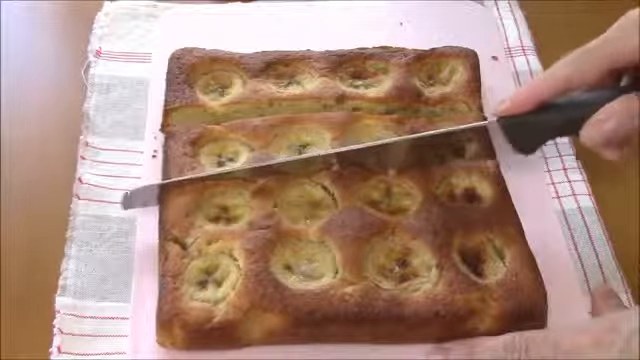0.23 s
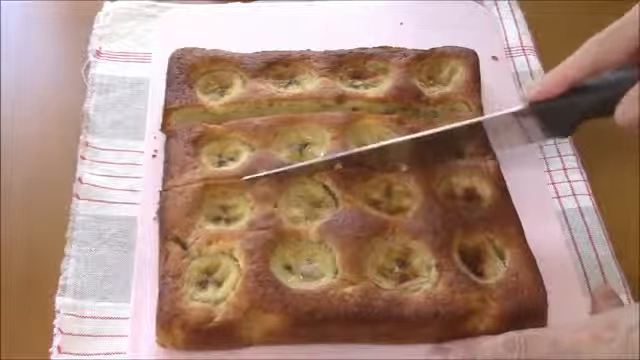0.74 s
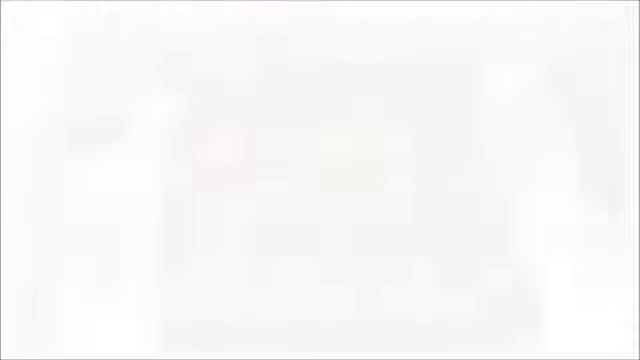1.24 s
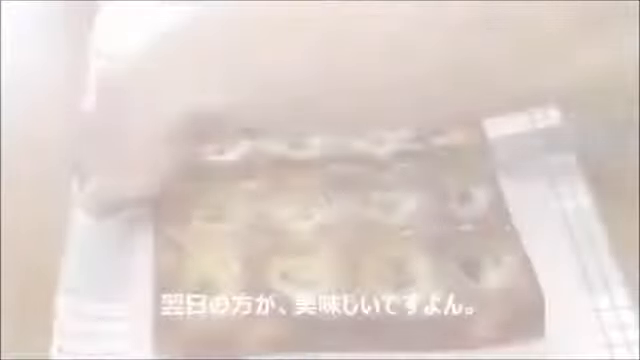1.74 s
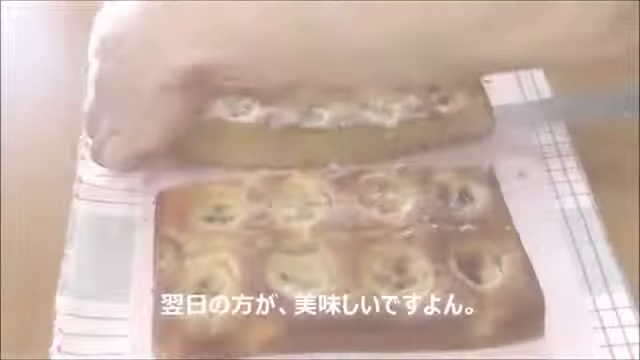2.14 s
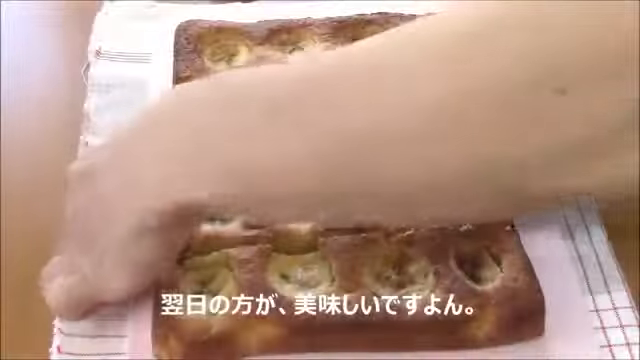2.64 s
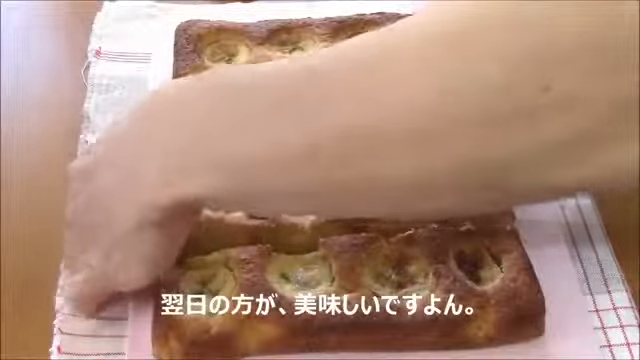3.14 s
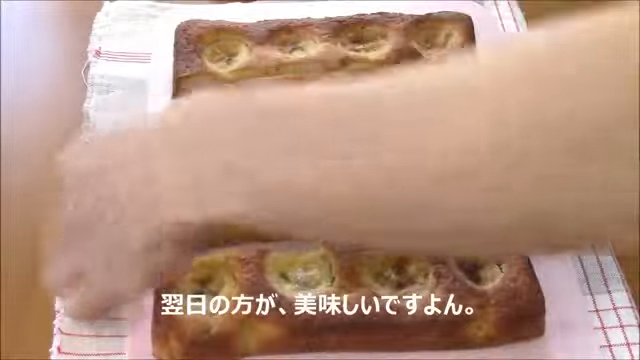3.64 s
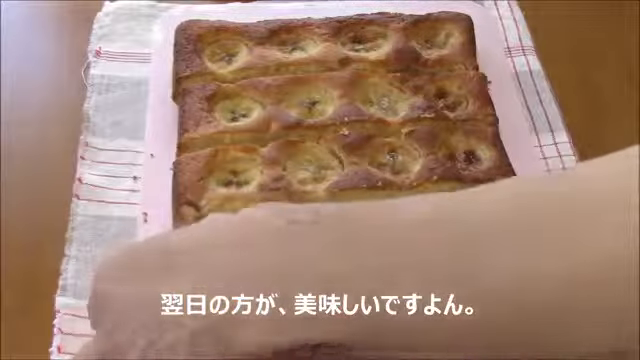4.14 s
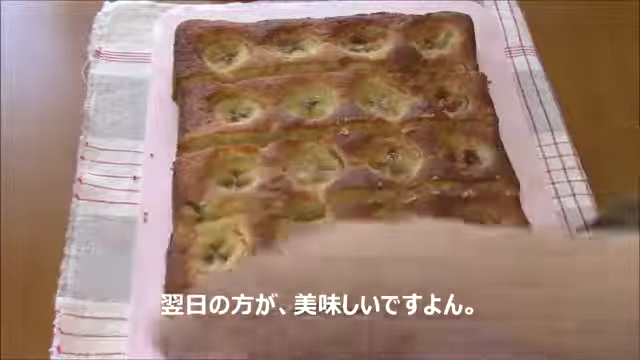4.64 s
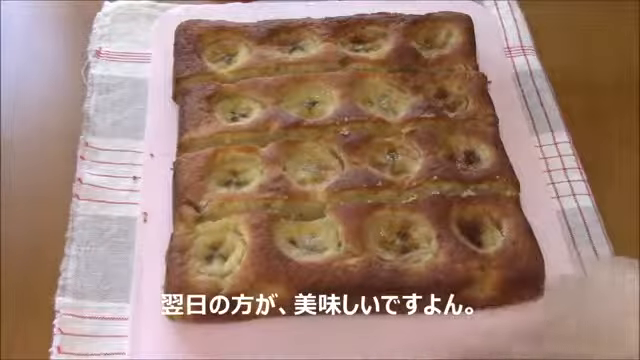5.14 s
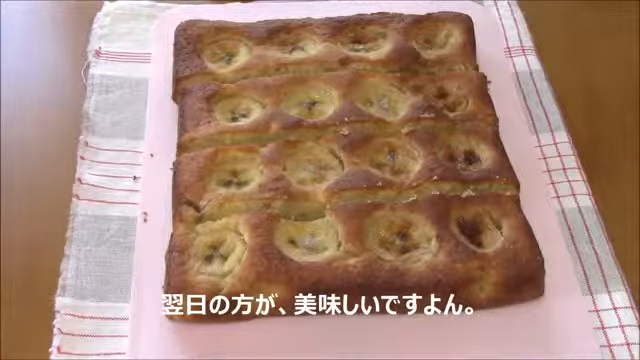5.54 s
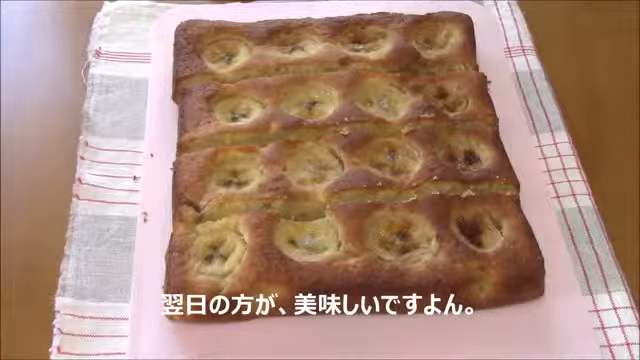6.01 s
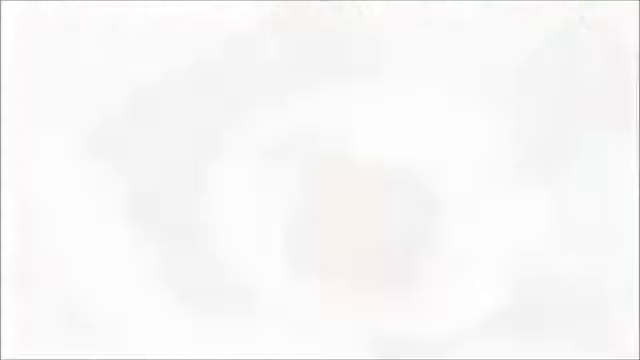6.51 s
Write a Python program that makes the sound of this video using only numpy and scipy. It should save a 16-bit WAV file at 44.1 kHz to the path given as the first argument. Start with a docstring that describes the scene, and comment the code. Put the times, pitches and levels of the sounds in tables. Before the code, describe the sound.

For the first second or so, a kitchen knife saws faintly through cake in quick strokes, with small snaps of crust. At 1.3 seconds it knocks on a plastic cutting board and drags softly. Around 2.3 seconds come louder knocks, a rasping scrape and a brief squeal, then more dragging and a tap. Another short scrape comes at 3.6 seconds. From 3.9 to 4.6 there is a run of light knocks and drags, a faint moist peeling of crumb and one more scrape. A hand brushes softly over the board around 5.4, with tiny crust ticks. At 6.5 seconds steel cutlery slides, squeaks and clinks several times on a plate, the brightest, loudest moment. Everything is close, in a small kitchen with soft room air, a few very faint high whining spurts and a faint appliance hum that stops as the cutlery begins.

```python
"""A kitchen knife saws through a cake, down to a plastic cutting board. Blade and slices drag,
scrape and squeal: stick-slip pulses ring the board. Crust crackles, moist crumb peels off,
light taps knock, a hand brushes past. At the end steel cutlery slides, squeaks and clinks
on a plate. Behind: small-kitchen reverb, room air, a faint high whine in paired spurts and
an appliance hum that stops as the cutlery starts."""
import sys
import numpy as np
from scipy import signal
from scipy.fft import rfft, irfft, next_fast_len
from scipy.io import wavfile
from scipy.ndimage import uniform_filter1d, map_coordinates

SR = 44100
rng = np.random.default_rng(int(sys.argv[2]) if len(sys.argv) > 2 else 0)


def generate_wav(signal):
    """Clip the signal to [-1, 1] and save it as 16-bit WAV at the path in sys.argv[1]."""
    frames = np.transpose(np.atleast_2d(signal))
    scaled = np.clip(frames, -1, 1) * 32767
    pcm = np.round(scaled).astype(np.int16)
    wavfile.write(sys.argv[1], SR, pcm)


N = 298557
TIME_S = np.arange(N) / SR

# Strokes on the board: (start [s], rise [s], hold [s], fall [s], relative level [dB],
# treble trim [dB], resonance [Hz], resonance lift [dB])
HARD_SCRAPES = [ (2.274, 0.088, 0.041, 0.077, -30.5, -17.5, 1200, 1.5),
                (3.564, .094, .028, 0.051, -29.5, -23.5, 1603, 3),
                (4.518, .075, .034, .04, -28.5, -19.5, 1302, 4), ]
SOFT_DRAGS = [ (.835, 0.027, .005, 0.013, -50.5, -12, 1290, 7),
              (.975, 0.028, 0.0099, 0.014, -48.5, -13, 1280, 5),
              (1.34, 0.0079, 0.024, 0.34, -46, -14, 420, 10),
              (1.49, .05, 0.016, 0.059, -49.5, -17, 430, 6.5),
              (1.63, 0.073, 0.014, 0.15, -43.5, -11.5, 470, 11),
              (1.85, .03, 0.0077, 0.084, -53, -20, 1300, 8), (2.45, 0.027, 0.03, 0.33, -43.5, -14, 760, 3),
              (2.5, .06, 0.019, 0.12, -42.5, -15.5, 740, 3),
              (2.668, 0.099, 0.063, 0.077, -42.5, -13.5, 1310, 3.5),
              (3.915, 0.017, 0.084, .1, -55.5, -11, 1290, -4),
              (3.99, 0.08, 0.12, 0.066, -42.5, -18, 1250, 3.5),
              (4.163, 0.011, 0.011, .055, -37, -21, 1290, 11.5),
              (5.01, 0.021, 0.035, .08, -62.5, -12, 1400, 10),
              (5.11, 0.1, 0.012, 0.021, -58, -1.5, 1400, 11), ]
# Slice squeals: (centre [s], top pitch [Hz], level [dB], overtone gain [dB])
SLICE_SQUEALS = [(2.378, 758, -31.8, 0), (2.555, 725, -43, -22)]
# Squeal overtones: (harmonic number, relative level [dB])
SQUEAL_OVERTONES = [(2, 7), (3, 5), (4, -5)]
# Saw effort on the crust: (time [s], level [dB])
SAW_LEVELS = [(0, -66.5), (.25, -65.5), (.55, -61.5), (.82, -61.5), (1.25, -68.5)]
# Crust snaps: (time [s], relative level [dB])
CRUST_SNAPS = [(0.079, -55), (.523, -50), (.679, -43), (0.823, -44), (3.264, -55.5), (3.287, -54),
               (3.346, -54), (5.441, -50), (5.468, -47), (5.6, -45.5)]
# Board taps: (time [s], relative level [dB], treble trim [dB])
BOARD_TAPS = [(0.989, -52, 13), (1.343, -28.5, 13), (1.620, -42.5, -4), (1.988, -39, -7), (2.275, -32, -8),
              (2.304, -25, -17), (2.713, -30, 3.5), (3.588, -37, 0), (3.922, -31.5, 9), (4.169, -26.5, -5),
              (4.300, -30.5, -3.5), (4.397, -32, -15), (4.457, -35, -25), (4.623, -29.5, 10),
              (4.928, -43.5, 7)]
# Noise strokes: (start [s], rise [s], hold [s], fall [s], level [dB])
CRUMB_PEELS = [(4.0, 0.066, 0.038, 0.11, -58)]
HAND_BRUSHES = [(5.28, 0.027, .005, 0.069, -71), (5.375, 0.097, 0.0051, 0.023, -53.5),
                (5.59, .01, .005, .07, -58.5)]
STEEL_SLIDES = [(6.53, 0.0019, 0.077, 0.031, -44.5), (6.625, .02, .015, 0.14, -50)]
# Steel squeaks: (start [s], rise [s], hold [s], fall [s], level [dB], initial pitch [Hz])
STEEL_SQUEAKS = [(6.562, 0.015, 0.011, 0.04, -45, 5050), (6.623, .008, .006, 0.036, -49, 4550)]
# Strikes on the plate: (time [s], level [dB], long ring [dB], pitch ratio)
PLATE_CLINKS = [(6.5304, -39, -18, 1.2), (6.6283, -25, -20, 1.075), (6.6569, -28.5, -13, 1.2),
                (6.6750, -18, -5, 1.0), (6.7202, -38.5, 5, .99), (6.754, -44, -7, 1.07)]
# Board resonances: (frequency [Hz], width [Hz], lift [dB])
BOARD_MODES = [(420, 200, 5), (612, 160, -7), (732, 120, 6.5), (1239, 37, 6.5), (1527, 8.7, 12.5),
               (1647, 62, 10.5), (2000, 250, -6.5), (2180, 96, 4), (2364, 150, 7), (2885, 106, 4.5),
               (3180, 94, -13), (3350, 57, 4.5), (4130, 240, 4), (4550, 220, -3.5), (5170, 280, 5.5),
               (5640, 260, -5.5), (7250, 690, 1.5), (9880, 150, 7)]
# Cutlery and plate modes at pitch ratio 1: (frequency [Hz], level [dB], T60 [s])
STEEL_MODES = [(1430, -5.5, 0.019), (3860, -7, 0.45), (4170, -6.5, 0.074), (6230, 6, 0.099),
               (6450, -11, .06), (7130, -18, .1), (9150, -2.5, 0.09), (10230, -10, 0.067),
               (11670, 5.5, 0.051), (12200, 3.5, 0.046), (12240, 4.5, 0.055), (13500, -14, .05),
               (14450, -10, .12)]
# Source spectra: (frequency [Hz], relative level [dB])
SCRAPE_SPECTRUM = [(100, -42), (250, -41), (400, -21), (750, -3.5), (1300, 5), (2200, -1), (3300, -7.5),
                   (5500, -21), (9000, -30), (13000, -32.5), (15500, -44)]
DRAG_SPECTRUM = [(100, -50), (220, -6.5), (400, -1.5), (750, 6), (1300, 7), (2200, -0.5), (3500, -7.5),
                 (5500, -27.5), (9000, -33.5), (13000, -36.5), (15500, -43)]
CRUST_SPECTRUM = [(300, -16), (1500, 0), (3000, -7.5), (4000, 1.5), (5200, -10.5), (6800, -3), (8500, -11),
                  (11000, -5.5), (14000, -4.5), (15500, -15.5)]
TAP_SPECTRUM = [(100, -34), (300, -7.5), (700, 6.5), (1300, 11.5), (2500, -1), (4200, -13), (6000, -19.5),
                (10000, -29.5), (15500, -41)]
SKIN_SPECTRUM = [(500, -34), (2500, -10), (4200, 0), (6000, -9), (8000, 0.5), (11000, -3), (14000, -6),
                 (15500, -7.5)]
GLAZE_SPECTRUM = [(180, -58), (300, -40), (342, -29), (674, -29), (769, -14.5), (1840, -10.5), (2740, -18),
                  (3450, -8.5), (4960, -2), (5660, -19), (7250, -6), (8420, -19), (8990, -6.5),
                  (12300, -23.5), (15500, -20)]
AIR_SPECTRUM = [(15, -64), (25, -41), (209, -28), (246, -17), (340, -19.5), (445, -14.5), (567, -17),
                (666, -14), (722, -14.5), (945, -14.5), (1760, -20.5), (2000, -15.5), (2300, -23),
                (3630, -26), (6920, -30.5), (15500, -36.5)]
PEEL_SPECTRUM = [(3000, -31), (6000, -6), (8200, 2), (9800, -6), (12000, -14), (15500, -26)]
# Kitchen decay: (frequency [Hz], T60 [s])
ROOM_DECAY = [(200, 0.11), (2000, 0.23), (12000, 0.16)]
# Appliance tones: (frequency [Hz], rms level [dB])
HUM_TONES = [(170, -92.5), (678.5, -64.5), (920.5, -80), (1104, -79.5), (1981, -85)]
# Whine pairs: (start [s])
WHINE_STARTS_S = [1.84, 2.9, 5.68, 6.32]

SWELL_DB, BRIGHTEN_DB = 20, 5.5  # per stroke: level gained in the rise, treble gained by release
SLOW_SLIP_HZ, FAST_SLIP_HZ, SLIP_RANGE_DB, DRAG_SLIP_HZ = 110, 540, 17, 800
SQUEAL_ARC_S, SQUEAL_SWELL_S = .105, .04  # 1/e half-widths
SAW_START_S, SAW_PERIOD_S, SAW_STROKE_S = 0.083, 0.143, .105
SQUEAK_SAG_PER_S = 0.75
WHINE_HZ, WHINE_S, WHINE_REPEAT_S = 6950, 0.059, .103
HUM_END_S, TOP_HZ = 6.53, 15300


def scraping():
    """Hard pushes judder over the board, faster as they swell; light drags slip finely."""
    push = contact(HARD_SCRAPES)
    speed = np.clip(1 + push[0] / SLIP_RANGE_DB, 0, 1)
    slip_hz = SLOW_SLIP_HZ + (FAST_SLIP_HZ - SLOW_SLIP_HZ) * speed ** 2
    judder = slips(slip_hz, scatter=.12, spread_db=1.7, grit=0.63)
    smear = slips(DRAG_SLIP_HZ, scatter=.35, spread_db=3.5, grit=0.49)
    scrapes = rub(push, judder, SCRAPE_SPECTRUM, body_db=-2.5, rasp_db=4.5)
    drags = rub(contact(SOFT_DRAGS), smear, DRAG_SPECTRUM, body_db=-2.87, rasp_db=-1.5)
    return scrapes + drags


def contact(rows):
    """Per-sample controls from the strongest stroke."""
    rows = np.array(rows)
    swells_db = np.array([swell(*row[:4]) for row in rows])
    strongest = np.argmax(swells_db + rows[:, 4:5], axis=0)
    start_s, rise_s, hold_s, _, db, bite_db, centre_hz, lift_db = rows[strongest].T
    swell_db = swells_db[strongest, np.arange(N)]
    remaining = np.clip(1 - (TIME_S - start_s) / (rise_s + hold_s), 0, 1)
    level_db = db + swell_db
    treble_db = level_db + bite_db - BRIGHTEN_DB * remaining
    return swell_db, level_db, treble_db, centre_hz, lift_db


def slips(rate_hz, scatter, spread_db, grit):
    """Uneven stick-slip impulses, each trailed by 2 ms of grit; rms 1."""
    rate_hz = rate_hz * np.ones(N)
    due = np.flatnonzero(np.diff(np.floor(np.cumsum(rate_hz) / SR)))
    late, strength = rng.standard_normal((len(due), 2)).T
    onsets = np.clip(due + scatter * late * SR / rate_hz[due], 0, N - 1).astype(int)
    pulses = unit(np.bincount(onsets, amp(spread_db * strength) / np.sqrt(rate_hz[due]), N))
    grit_power = signal.lfilter([1], [1, -np.exp(-1 / (0.002 * SR))], pulses ** 2)
    return unit(pulses + grit * unit(np.sqrt(grit_power) * rng.standard_normal(N)))


def rub(controls, force, spectrum, body_db, rasp_db):
    """Slips ring the board; a sharper bite adds treble."""
    _, level_db, treble_db, centre_hz, lift_db = controls
    ring = signal.fftconvolve(force, board_response(spectrum))[:N]
    ring = unit(arm_echo(ring, delay_s=.0016, sway=.12, gain=.3))
    highs = highpass(ring, corner_hz=4800, slope=6)
    body = unit(contact_resonance(ring - highs, centre_hz, lift_db, width_oct=.13))
    rasp = unit(shimmer(highs, depth_db=2.8))
    return body * amp(level_db + body_db) + rasp * amp(treble_db + rasp_db)


def board_response(spectrum, size=8192):
    """Minimum-phase impulse response of the board; energy 1."""
    hz = np.fft.rfftfreq(size, 1 / SR)
    modes_db = sum(lift_db / (1 + (2 * (hz - mode_hz) / width_hz) ** 2)
                   for mode_hz, width_hz, lift_db in BOARD_MODES)
    cepstrum = irfft(np.log(amp(along(spectrum, hz) + modes_db)))
    cepstrum[1:size // 2] *= 2
    cepstrum[size // 2 + 1:] = 0
    response = irfft(np.exp(rfft(cepstrum)))
    return response / np.linalg.norm(response)


def arm_echo(x, delay_s, sway, gain):
    """Reflection off the moving arm: a drifting comb."""
    n = np.arange(N)
    lag = SR * delay_s * np.exp(sway * wobble(9))
    return x + gain * np.interp(n - lag, n, x)


def contact_resonance(x, centre_hz, lift_db, width_oct):
    """Contact position weights one resonance, at constant power."""
    hz, t, bins = signal.stft(x, SR, nperseg=512)
    at = np.minimum((t * SR).astype(int), N - 1)
    detune = np.log2((hz[:, None] + 1) / centre_hz[at]) / width_oct
    gain = amp(lift_db[at] / (1 + detune ** 2))
    power = np.mean(np.abs(bins) ** 2, axis=1, keepdims=True)
    gain /= np.sqrt((power * gain ** 2).sum(0) / power.sum())
    return signal.istft(bins * gain, SR, nperseg=512)[1][:N]


def shimmer(x, depth_db):
    """Crowded modes take turns as the contact moves: narrow random peaks."""
    bins = signal.stft(x, SR, nperseg=512)[2]
    peaks = uniform_filter1d(rng.standard_normal(bins.shape), size=4, axis=0)
    lasting = uniform_filter1d(peaks, size=20, axis=1)
    return signal.istft(bins * amp(depth_db * unit(lasting)), SR, nperseg=512)[1][:N]


def squeals():
    """Slips lock into a rough tone that rises and falls with the push."""
    out = np.zeros(N)
    for centre_s, top_hz, db, overtones_db in SLICE_SQUEALS:
        t = TIME_S - centre_s
        pitch_hz = top_hz * np.exp(-(t / SQUEAL_ARC_S) ** 2) * (1 + .012 * wobble(500))
        phase = 2 * np.pi * np.cumsum(pitch_hz) / SR
        overtones = sum(amp(partial_db + 4.5 * wobble(350)) * np.sin(k * phase)
                        for k, partial_db in SQUEAL_OVERTONES)
        tone = unit(np.sin(phase) + amp(overtones_db) * overtones)
        out += amp(db) * tone * np.exp(-(t / SQUEAL_SWELL_S) ** 2)
    return out


def crust():
    """Crust tears in grains with each saw stroke; single crumbs snap."""
    travel = np.minimum((TIME_S - SAW_START_S) % SAW_PERIOD_S / SAW_STROKE_S, 1)
    speed = np.sqrt(np.abs(np.sin(np.pi * travel)))
    effort = amp(np.interp(TIME_S, *np.transpose(SAW_LEVELS), right=-np.inf))
    grains = shimmer(grain_noise(spread_db=5.7, rate_hz=1200), depth_db=2.0)
    sawing = effort * speed * coloured(grains, CRUST_SPECTRUM)
    snaps = np.zeros(N)
    for s, db in CRUST_SNAPS:
        add(snaps, s, amp(db + 21) * (burst(t60_s=0.0082) + .5 * burst(t60_s=0.11)))
    return sawing + filtered(snaps, lambda hz: amp(along(CRUST_SPECTRUM, hz)))


def peeling():
    """Moist crumb lets go of the plastic in bright ticks."""
    ticks = slips(rate_hz=340, scatter=1.0, spread_db=1.5, grit=0.62)
    return coloured(ticks, PEEL_SPECTRUM) * strokes(CRUMB_PEELS)


def taps():
    """Light knocks ring the board, with brief chatter."""
    out, knock = np.zeros(N), board_response(TAP_SPECTRUM)
    treble_sos = signal.butter(2, 3500, "high", fs=SR, output="sos")
    for s, db, treble_db in BOARD_TAPS:
        chatter = 1.5 * burst(t60_s=0.0033) + 1.2 * burst(t60_s=0.11)
        hit = knock + signal.fftconvolve(knock, chatter)[:len(knock)]
        hit += (amp(treble_db + 9.5) - 1) * signal.sosfiltfilt(treble_sos, hit, padtype=None)
        add(out, s, amp(db + 12.5) * hit / np.linalg.norm(hit))
    return out


def hand():
    """Skin hisses over the board."""
    return coloured(grain_noise(spread_db=3.3, rate_hz=300), SKIN_SPECTRUM) * strokes(HAND_BRUSHES)


def grating():
    """Steel slides over the glaze, stirring damped modes."""
    grains = coloured(grain_noise(spread_db=2.6, rate_hz=900), GLAZE_SPECTRUM)
    t, modes = steel_ring(pitch_ratio=0.94)
    ring = unit(signal.fftconvolve(grains, modes * decay(t, t60_s=.018))[:N])
    return unit(shimmer(grains, depth_db=4) + .6 * ring) * strokes(STEEL_SLIDES)


def clinks():
    """Steel strikes the plate; the contact buzzes and damps most of the ring."""
    out = np.zeros(N)
    for s, db, ring_db, pitch_ratio in PLATE_CLINKS:
        t, modes = steel_ring(pitch_ratio)
        buzz = signal.fftconvolve(modes * decay(t, t60_s=0.013), burst(t60_s=0.025))[:len(t)]
        ring_gain = amp(ring_db) + 1.26 * decay(t, t60_s=0.038)
        hit = buzz / np.abs(buzz).max() + ring_gain * modes / np.abs(modes).max()
        add(out, s, amp(db) * hit / np.abs(hit).max())
    return highpass(out, corner_hz=600, slope=4)


def steel_ring(pitch_ratio):
    """Cutlery and plate modes at random strengths: (time [s], ring)."""
    t = np.arange(SR // 3) / SR
    hz, db, t60_s = np.transpose(STEEL_MODES)[:, :, None]
    gain = amp(db + 1.1 * rng.standard_normal(db.shape))
    sign = (-1) ** np.arange(len(STEEL_MODES))[:, None]
    modes = sign * gain * decay(t, t60_s) * np.sin(2 * np.pi * pitch_ratio * hz * t)
    return t, modes.sum(0)


def squeaks():
    """Sliding steel squeaks, wavering and sagging in pitch."""
    out = np.zeros(N)
    for start_s, *shape_s, db, hz in STEEL_SQUEAKS:
        age_s = np.maximum(TIME_S - start_s, 0)
        pitch_hz = hz * np.exp(-SQUEAK_SAG_PER_S * age_s) * (1 + 0.024 * wobble(900))
        tone = unit(np.sin(2 * np.pi * np.cumsum(pitch_hz) / SR) * amp(2.5 * wobble(300)))
        out += tone * amp(db + swell(start_s, *shape_s))
    return out


def kitchen_reverb(x):
    """Wall reflections: a short noise tail, longest in the midrange."""
    hz, t, bins = signal.stft(rng.standard_normal(SR // 2), SR, nperseg=256)
    tail = signal.istft(bins * decay(t, along(ROOM_DECAY, hz)[:, None]), SR, nperseg=256)[1]
    delayed = np.pad(x, (180, 0))
    return signal.fftconvolve(delayed, tail / np.linalg.norm(tail))[:N]


def appliance_hum():
    """Slightly unsteady tones, gone by HUM_END_S."""
    hum = np.zeros(N)
    for hz, db in HUM_TONES:
        peak = np.sqrt(2) * amp(db + 0.25 * wobble(4.27))
        hum += peak * np.sin(2 * np.pi * hz * TIME_S + 0.28 * wobble(5))
    return hum * np.clip((HUM_END_S - TIME_S) * 100, 0, 1)


def room_air():
    """Steady, dull noise."""
    return amp(-63.5) * coloured(rng.standard_normal(N), AIR_SPECTRUM)


def whine():
    """Paired spurts of a thin, wavering tone."""
    gate, spurt = np.zeros(N), signal.windows.tukey(int(WHINE_S * SR))
    for s in WHINE_STARTS_S:
        add(gate, s, spurt)
        add(gate, s + WHINE_REPEAT_S, spurt)
    return amp(-72.5) * gate * np.sin(2 * np.pi * WHINE_HZ * TIME_S + 0.37 * wobble(90))


def swell(start_s, rise_s, hold_s, fall_s):
    """Stroke envelope [dB]: rounded rise, hold, then SWELL_DB lost per fall_s."""
    t = TIME_S - start_s - rise_s
    db = -SWELL_DB * ((np.minimum(t, 0) / rise_s) ** 2 + np.maximum(t - hold_s, 0) / fall_s)
    return np.where(t < -rise_s, -200, np.maximum(db, -200))


def strokes(rows):
    """Summed stroke gain per sample."""
    return sum(amp(db + swell(*shape_s)) for *shape_s, db in rows)


def grain_noise(spread_db, rate_hz):
    """Noise with a fast random level."""
    return rng.standard_normal(N) * amp(spread_db * wobble(rate_hz))


def burst(t60_s, size=8192):
    """Decaying noise; energy 1."""
    puff = rng.standard_normal(size) * decay(np.arange(size) / SR, t60_s)
    return puff / np.linalg.norm(puff)


def decay(t, t60_s):
    """Gain falling 60 dB per t60_s."""
    return amp(-60 * t / t60_s)


def wobble(rate_hz):
    """Smooth random curve, knots at rate_hz."""
    knots = rng.standard_normal(int(N * rate_hz / SR) + 4)
    return map_coordinates(knots, [TIME_S * rate_hz])


def filtered(x, response):
    """Zero-phase filter with gain response(hz)."""
    size = next_fast_len(N + SR // 2)
    return irfft(rfft(x, size) * response(np.fft.rfftfreq(size, 1 / SR)), size)[:N]


def highpass(x, corner_hz, slope):
    """Bass cut; gain goes as hz ** slope below the corner."""
    return filtered(x, lambda hz: 1 - 1 / (1 + (hz / corner_hz) ** slope))


def coloured(x, spectrum):
    """Shape by a spectrum; rms 1."""
    return unit(filtered(x, lambda hz: amp(along(spectrum, hz))))


def along(points, hz):
    """Interpolate (frequency [Hz], value) on a log axis."""
    knots_hz, values = np.transpose(points)
    return np.interp(np.log(hz + 1), np.log(knots_hz + 1), values)


def add(track, start_s, sound):
    """Mix in place."""
    part = track[round(start_s * SR):][:len(sound)]
    part += sound[:len(part)]


def amp(db):
    """dB to gain."""
    return 10 ** (np.asarray(db) / 20)


def unit(x):
    """Scale to rms 1."""
    return x / np.sqrt(np.mean(x ** 2) + 1e-20)


def scene():
    """Close handling over the room background; mono."""
    cake = scraping() + squeals() + peeling() + taps() + crust() + hand()
    cutlery = grating() + clinks() + squeaks()
    near = cake + cutlery
    return (near + amp(-11) * kitchen_reverb(near) + appliance_hum() + room_air() + whine())[None]


def record(dry):
    """Low-pass at TOP_HZ, 200 Hz transition."""
    return filtered(dry[0], lambda hz: np.clip((TOP_HZ - hz) / 200 + .5, 0, 1))[None]


dry = scene()
out = record(dry)
generate_wav(out)
```